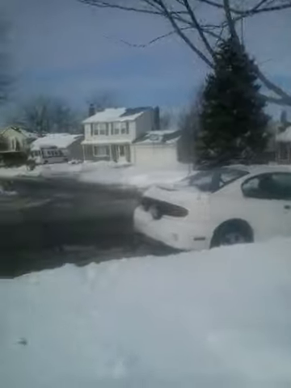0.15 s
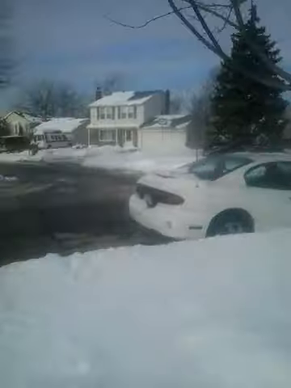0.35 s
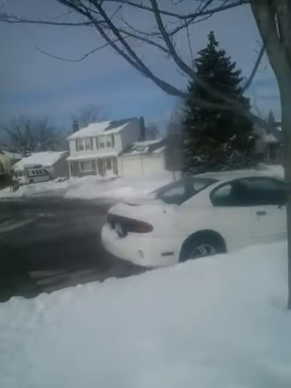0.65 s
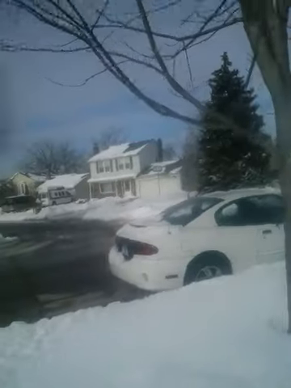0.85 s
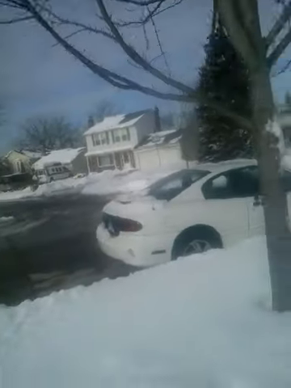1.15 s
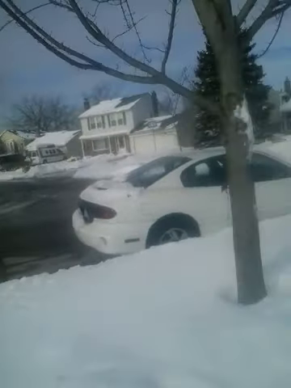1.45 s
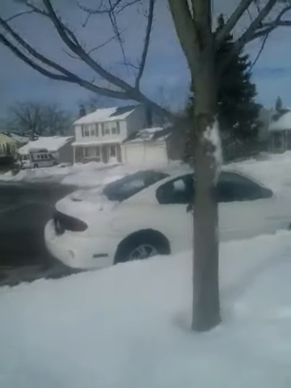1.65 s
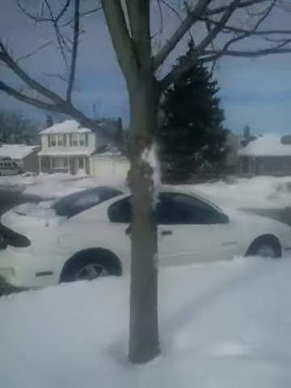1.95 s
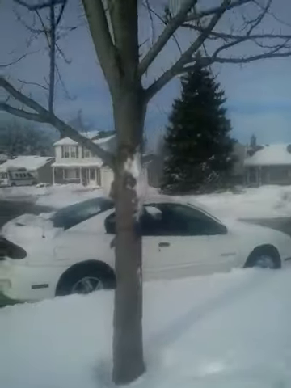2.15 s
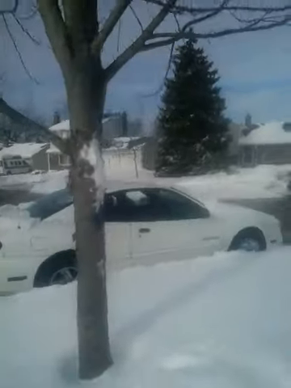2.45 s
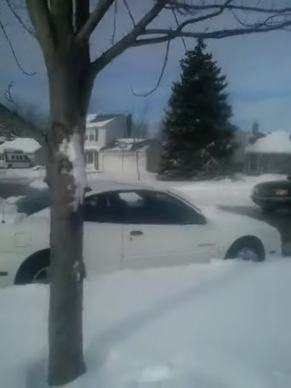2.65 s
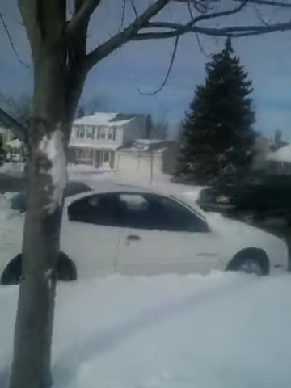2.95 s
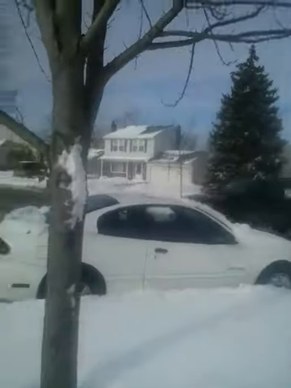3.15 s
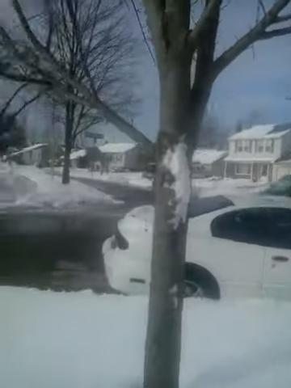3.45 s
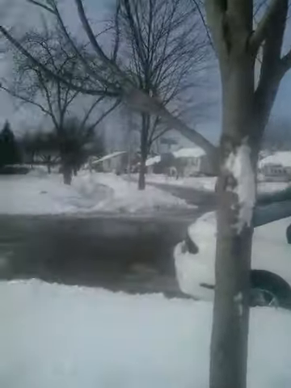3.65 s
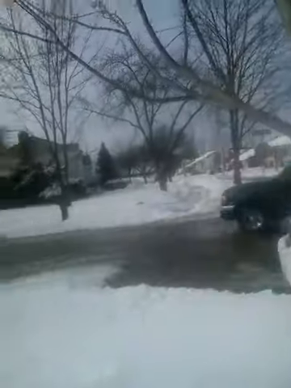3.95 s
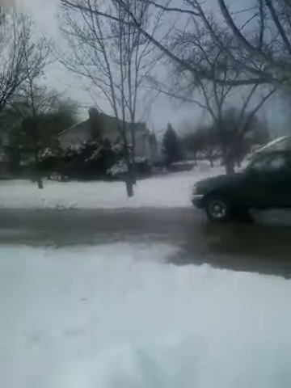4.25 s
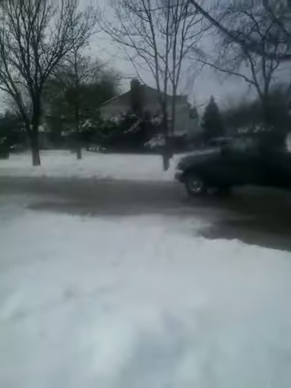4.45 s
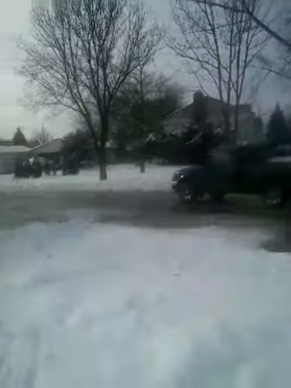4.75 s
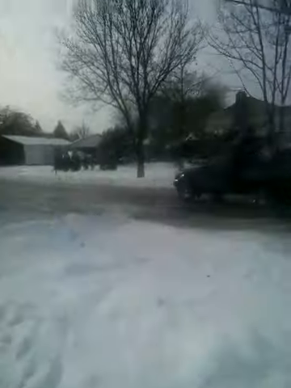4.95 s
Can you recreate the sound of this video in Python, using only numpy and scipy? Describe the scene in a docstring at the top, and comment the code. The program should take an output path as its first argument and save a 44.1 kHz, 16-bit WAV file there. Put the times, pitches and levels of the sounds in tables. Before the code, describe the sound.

Wet, slushy tyre hiss swells as a pickup rolls slowly past, with a close, thin squeak ending in a sharp wet smack early on.

```python
"""A slushy suburban street: a pickup crawls along it, its tyres spitting wet spray (shaped noise and droplets).
A parked car screens the spray for a moment, then it comes into the open; an echo, likely off the road, combs it.
Slush lumps, a thin fling of spray and a brief brake chirp punctuate a dull road roar and a low engine note.
Close by, a thin wet two-note squeak stalls in chirps and ends in a sharp smack, with small wet ticks around it."""
import sys
import numpy as np
from scipy import signal
from scipy.fft import rfft, irfft, next_fast_len
from scipy.io import wavfile
from scipy.ndimage import uniform_filter1d, minimum_filter1d

SR = 44100
rng = np.random.default_rng(int(sys.argv[2]) if len(sys.argv) > 2 else 0)


def unload_audio(sound):
    """Save the sound as a 16-bit wav file, at the path given as the first command line argument."""
    columns = np.transpose(np.atleast_2d(sound))
    # keep every value between -1 and 1, then stretch to whole-number steps
    steps = np.round(np.clip(columns, -1, 1) * 32767)
    wavfile.write(sys.argv[1], SR, steps.astype(np.int16))


N = 225374
TIME = np.arange(N) / SR


def from_db(db):
    """Decibels to gain."""
    return 10 ** (np.asarray(db) / 20)


def rms_one(x):
    """Scale to an rms of 1."""
    return x / np.sqrt(np.mean(x ** 2) + 1e-20)


def white():
    """White noise over the whole scene."""
    return rng.standard_normal(N)


def in_time(rows, column=1):
    """One column of a time table, interpolated at every sample."""
    rows = np.array(rows)
    return np.interp(TIME, np.sort(rows[:, 0]), rows[:, column])


def at_hz(spectrum, hz):
    """Gain of a spectrum, read on a log-frequency axis."""
    spectrum = np.array(spectrum)
    return from_db(np.interp(np.log(hz + 1e-9), np.log(spectrum[:, 0]), spectrum[:, 1]))


def colour(x, spectrum):
    """Filter x by a spectrum; rms 1."""
    size = next_fast_len(N)
    gain = at_hz(spectrum, np.fft.rfftfreq(size, 1 / SR))
    return rms_one(irfft(rfft(x, size) * gain, size)[:N])


def band(x, low_hz, high_hz):
    """Second-order band-pass."""
    return signal.sosfilt(signal.butter(2, [low_hz, high_hz], "band", fs=SR, output="sos"), x)


def cut(x, edge_hz, kind):
    """Gentle low- or high-pass."""
    return signal.sosfilt(signal.butter(2, edge_hz, kind, fs=SR, output="sos"), x)


def read(x, at_s):
    """x at the given moments, between the samples too, wrapping round at the ends."""
    fine = signal.resample_poly(x, 4, 1)
    return np.interp(at_s * SR * 4, np.arange(len(fine)), fine, period=len(fine))


def phase_of(hz):
    """Running phase of a moving pitch."""
    return 2 * np.pi * np.cumsum(hz) / SR


def envelope(start_s, length_s, attack_s, t60_s):
    """Rise, hold until the length is over, die away."""
    age = TIME - start_s
    rise = np.clip(age / attack_s, 0, 1)
    return rise * from_db(-60 * np.maximum(age - length_s, 0) / t60_s)


def drift(rate_hz):
    """Random wander with a spread of 1; a higher rate wanders faster."""
    # made at a tenth of the sample rate; the first 4000 steps let the filter settle
    r = np.exp(-20 * np.pi * rate_hz / SR)
    steps = rng.standard_normal(N // 10 + 4002)
    slow = signal.lfilter([1], [1, -2 * r, r * r], steps)[4000:]
    return np.interp(np.arange(N) / 10, np.arange(len(slow)), rms_one(slow))


def droplets(per_s, spread_db):
    """Random clicks of very uneven size; rms 1."""
    sizes = from_db(spread_db * np.minimum(rng.exponential(1, N), 4)) * rng.choice([-1, 1], N)
    return rms_one(sizes * (rng.random(N) < per_s / SR))


def bursts(rows, width):
    """Each event is a dying puff of noise around its ring pitch."""
    out, age = np.zeros(N), np.arange(SR // 10) / SR
    for start_s, peak_db, ring_hz, t60_s in rows:
        decaying = rng.standard_normal(len(age)) * np.exp(-np.log(1000) * age / t60_s)
        puff = band(decaying, ring_hz / (1 + width), ring_hz * (1 + width))
        puff = from_db(peak_db) * puff / np.abs(puff).max()
        start = round(start_s * SR)
        out[start:start + len(age)] += puff[:N - start]
    return out


# spray colour up the street, beside the parked car and in the open: (frequency [Hz], relative level per Hz [dB])
SPRAY_FAR = [(100, -22), (340, -39), (470, -7), (860, -7), (1120, -14.5), (1850, 4.5), (2070, -6),
             (4220, -4.5), (4520, -6.5), (5040, -7.5), (5560, -19), (7060, 0.5), (10940, -14.5),
             (11500, -17), (14690, -22), (15590, -22)]
SPRAY_BESIDE = [(100, -34), (340, -20), (650, -8.3), (820, 0.5), (1210, -22), (1460, 0), (2020, -5),
                (2280, 0.5), (2970, -7.5), (4440, -5), (5300, -20), (7020, -4), (9560, -6.5),
                (10160, -15.5), (11930, -15.2), (15590, -23.5)]
SPRAY_OPEN = [(100, -11), (340, -14), (1460, -6), (1850, -14.5), (2240, -1), (3190, -7.5), (3360, -11.5),
              (4350, -7), (4820, -25), (5250, -20), (6460, -8.5), (6850, -1.5), (9520, -10.5),
              (11070, -22.5), (12880, -18), (15590, -24.4)]
# the truck's place: (time [s], place [0 up the street, 1 beside the parked car, 2 in the open])
TRUCK_PLACE = [(1.1, 0), (1.8, 1), (3.6, 1), (3.95, 2)]
# short echo, likely off the road: (time [s], lag [ms])
ECHO_LAG = [(0, .88), (.72, .79), (1.0, .87), (1.7, .89), (2.0, .835), (2.8, .755), (3.5, .9), (3.9, .74),
            (4.15, .795), (4.5, .755), (5.11, .735)]
# the spray's brightness near 2.3 kHz: (time [s], gain of that band [dB])
BRIGHTNESS_GAIN = [(1.3, -0.5), (1.9, -3.5), (2.9, 3.5), (4.1, 0), (5.11, 1.5)]


def spray(slide_above_hz=3000, level_db=1.73, scatter_db=-14.5, echo_gain=.38, treble_slide=.8):
    """Tyres throw slush; the hiss takes its colour from the truck's place, and the echo combs it."""
    hiss = wet_hiss(grain=0.95, splash_db=0.5, patchy_db=1.45)
    place, lag_ms = in_time(TRUCK_PLACE), in_time(ECHO_LAG)
    # as the echo paths shorten, the treble is read faster: its peaks and notches slide upward
    slide_s = np.cumsum((.79 / lag_ms) ** treble_slide) / SR
    direct = 0
    for k, (spectrum, trim_db) in enumerate([(SPRAY_FAR, 5.0), (SPRAY_BESIDE, 1.5), (SPRAY_OPEN, 1.5)]):
        view = colour(hiss, spectrum)
        treble = read(cut(view, slide_above_hz, "high"), slide_s + .5)
        view = cut(view, slide_above_hz, "low") + treble
        nearness = np.clip(1 - np.abs(place - k), 0, 1)  # crossfade between places
        direct = direct + view * from_db(trim_db) * nearness
    bright_band = band(direct, low_hz=1880, high_hz=2640)
    direct = direct + (from_db(in_time(BRIGHTNESS_GAIN)) - 1) * bright_band
    # some of the hiss arrives scattered, without peaks or notches
    scattered = rms_one(band(white(), low_hz=1770, high_hz=7000))
    direct = (direct + from_db(scatter_db) * scattered) * spray_gain() * from_db(level_db)
    return direct + echo_gain * read(direct, TIME - lag_ms / 1000)


def wet_hiss(grain, splash_db, patchy_db):
    """Mist and droplets; splashes swell all octaves together, and each also flickers alone."""
    out, splash = 0, drift(35)
    sources = [white() + grain * droplets(per_s=2400, spread_db=5.0) for _ in range(2)]
    for k, low_hz in enumerate(250 * 2. ** np.arange(6)):
        octave = band(sources[k % 2], low_hz, 2 * low_hz)  # neighbours take turns with the sources
        out = out + octave * from_db(splash_db * splash + patchy_db * drift(19))
    return out


# tyre spray as the truck draws near: (time [s], level before trims [dB])
SPRAY_APPROACH = [(0, -49.5), (.88, -47.5), (1.38, -45.5), (1.9, -37.5), (2.6, -38), (4.1, -35.5),
                  (5.11, -34)]
# a tyre ploughs through deeper slush: (time [s], length [s], gain of the swell [dB])
DEEP_SLUSH = [(0.07, 0.023, 4), (0.24, 0.03, 6), (0.326, 0.074, 5), (0.494, 0.12, 4.5), (.612, .16, 8.5),
              (0.945, 0.083, 9), (1.135, 0.025, 3), (2.642, 0.022, 1.5), (4.42, 0.036, 3.5),
              (4.527, 0.054, 3)]


def spray_gain(slosh_attack_s=.017, slosh_t60_s=.22, screen_loss_db=22, screen_power=1.8):
    """The spray grows as the truck nears, swells in deep slush and sinks behind the parked car."""
    swell = sum((from_db(gain_db) - 1) * envelope(start_s, length_s, slosh_attack_s, slosh_t60_s)
                for start_s, length_s, gain_db in DEEP_SLUSH)
    # the parked car hides the tyres slowly and frees them quickly
    hiding, clearing = (TIME - 2.62) / .89, (4.06 - TIME) / .22
    hidden = np.clip(np.minimum(hiding, clearing), 0, 1)
    return (1 + swell) * from_db(in_time(SPRAY_APPROACH) - screen_loss_db * hidden ** screen_power)


# the squeak; its level drives both notes and their air: (time [s], whistle pitch [Hz], level before trims [dB])
SQUEAK_WHISTLE = [(1.13, 7185, -22), (1.16, 7026, -23), (1.172, 8033, -15), (1.178, 9100, -15),
                  (1.194, 9560, -17), (1.222, 7700, -17), (1.246, 8400, -16), (1.256, 8150, -17.5),
                  (1.276, 8800, -17), (1.308, 9340, -18.5), (1.326, 8057, -16.5), (1.354, 7365, -20),
                  (1.414, 7155, -21), (1.42, 6988, -24)]
# its second, reedy note: (time [s], pitch [Hz])
SQUEAK_REED = [(1.13, 3520), (1.166, 3535), (1.186, 5360), (1.194, 5700), (1.22, 4550), (1.23, 4440),
               (1.25, 4570), (1.284, 5470), (1.308, 5420), (1.326, 5000), (1.348, 5200), (1.36, 5637)]


def squeak(whistle_db=-1.0, reed_db=-5.0, air_db=-18.0, coupling=0.037, rough_db=1.0):
    """Air through a narrow wet gap sounds two unrelated notes: a pure whistle and a cavity-shaped reedy one."""
    whistle_hz = in_time(SQUEAK_WHISTLE) * (1 + .015 * drift(220) + .007 * drift(1200))
    reed_hz = in_time(SQUEAK_REED) * (1 + .009 * drift(200))
    # the reedy note speaks first and gives out first
    whistling = envelope(1.164, length_s=.258, attack_s=.02, t60_s=.021)
    buzzing = envelope(1.128, length_s=.18, attack_s=.0087, t60_s=.2)
    # the reedy note throttles the whistle, which adds faint side tones
    throttle = 1 + coupling * buzzing * np.sin(phase_of(reed_hz))
    whistle = np.sin(phase_of(whistle_hz)) * from_db(whistle_db + rough_db * drift(196)) * throttle
    reed = from_db(reed_db) * reedy(reed_hz)
    # turbulence shakes both notes and spreads a halo around them
    turbulence = 1 + .17 * drift(900)
    notes = np.sqrt(2) * turbulence * (whistle * whistling + reed * buzzing)
    air = from_db(air_db) * colour(white(), CAVITY_COLOUR) * np.maximum(whistling, buzzing)
    return (notes + air) * from_db(in_time(SQUEAK_WHISTLE, column=2))


# cavity behind the squeaking gap, which also colours the hiss and the smack: (frequency [Hz], gain [dB])
CAVITY_COLOUR = [(100, -29), (450, -25), (1900, -31), (3000, -12), (4300, -15.5), (5600, -14), (7100, 2),
                 (9000, 3.5), (11000, -6.5), (12200, -13), (14000, -13), (15000, -18), (16000, -28)]


def reedy(hz, top_hz=14500):
    """Four harmonics shaped by the cavity, fading steeply above the top."""
    out = 0
    for k in range(1, 5):
        gain = at_hz(CAVITY_COLOUR, k * hz) / (1 + (k * hz / top_hz) ** 20)
        out = out + np.sin(k * phase_of(hz)) * gain
    return out


# the squeak stalls: (time [s], length [s], starting whistle [Hz], starting lower note [Hz], whistle level [dB])
STALL_CHIRPS = [(1.424, .014, 7130, 4580, -30.5), (1.456, 0.005, 7200, 4880, -24)]


def chirps(fall_oct_per_s=19, lower_fall_share=.5, lower_db=-8.5, attack_s=.003, t60_s=.065):
    """Both notes catch again and slide down unsteadily, the lower one more slowly."""
    out = 0
    for start_s, length_s, whistle_hz, lower_hz, level_db in STALL_CHIRPS:
        fall = 2 ** -np.clip(fall_oct_per_s * (TIME - start_s), 0, 1)  # one octave at most
        waver = 1 + .018 * drift(220)
        whistle = np.sin(phase_of(whistle_hz * waver * fall))
        lower = np.sin(phase_of(lower_hz * waver * fall ** lower_fall_share))
        notes = np.sqrt(2) * (whistle + from_db(lower_db) * lower)
        out = out + notes * from_db(level_db) * envelope(start_s, length_s, attack_s, t60_s)
    return out


# hiss around the squeak: a slow swell, short puffs, and a brief rise into the smack:
# (time [s], length [s], attack [s], level [dB])
SQUEAK_HISS = [(0.958, 0.18, .18, -28.5), (1.163, .012, .008, -33), (1.421, 0.017, 0.0051, -22.5),
               (1.442, 0.037, .01, -31), (1.493, 0.013, .012, -25)]
# the hollow body of the smack: (frequency [Hz], relative level per Hz [dB])
SMACK_BODY_COLOUR = [(24, -53), (40, -23), (350, -19), (569, 0.5), (878, -13), (1130, -6), (1280, -17),
                     (1590, -21), (1810, -0.5), (3000, -23), (3900, -45), (6600, -120)]


def smack(burst_db=-4.5, tail_db=-27.0, pop_db=-17.5, body_db=-6.5, hiss_t60_s=.08):
    """Hiss leads in, air bursts as the seal breaks, and the opening gives a broad crack with a low body."""
    hiss = colour(white() + .7 * droplets(per_s=1500, spread_db=3.5), CAVITY_COLOUR)
    hiss_gain = sum(from_db(level_db) * envelope(start_s, length_s, attack_s, hiss_t60_s)
                    for start_s, length_s, attack_s, level_db in SQUEAK_HISS)
    # the burst swells as the seal gives
    burst = rms_one(band(colour(white(), CAVITY_COLOUR), 5800, 12500)) * from_db(2.5 * drift(400))
    breaking = envelope(1.497, length_s=.028, attack_s=.014, t60_s=.0084)
    tail = from_db(tail_db) * envelope(1.497, length_s=.028, attack_s=.014, t60_s=.11)
    # the gap snaps open at its end
    crack = rms_one(band(white(), 2300, 16300))
    body = from_db(body_db) * colour(white(), SMACK_BODY_COLOUR)
    pop = (crack + body) * envelope(1.511, length_s=.0115, attack_s=.0056, t60_s=.044)
    return hiss * hiss_gain + from_db(burst_db) * burst * (breaking + tail) + from_db(pop_db) * pop


# small wet ticks: (time [s], peak before the high-pass [dB], ring [Hz], t60 [s])
WET_TICKS = [(.9585, -21, 12100, 0.0035), (1.027, -18.5, 9250, .02), (1.058, -15, 9150, 0.018),
             (1.181, -10, 9550, .012), (1.4375, -9, 8070, 0.003), (1.4893, -15, 8320, 0.0028),
             (1.4925, -12, 8240, .003), (1.4987, -11, 8450, .003), (1.627, -26, 12900, 0.0065),
             (1.732, -25, 12000, 0.0053), (1.794, -14, 10000, 0.049), (1.82, -20, 13000, .015),
             (2.038, -21, 8900, 0.013), (2.367, -21, 13000, 0.0054)]


def ticks():
    """Tiny wet clicks: short puffs of noise at a high ring pitch, thinned by a high-pass."""
    return cut(bursts(WET_TICKS, width=0.32), edge_hz=3800, kind="high")


# lumps of slush bursting under the tread: (time [s], peak [dB], ring [Hz], t60 [s])
SLUSH_LUMPS = [(.033, -24.5, 7260, .012), (.272, -31, 3800, 0.022), (2.531, -31.5, 840, 0.017),
               (2.677, -27, 7600, .008), (3.075, -30.5, 454, 0.039), (3.83, -36, 1394, .012),
               (4.086, -24.5, 2600, .015), (4.137, -21, 2630, .015), (4.325, -23.5, 990, 0.034),
               (4.636, -22, 2950, 0.024), (4.674, -28, 991, 0.022), (4.78, -28, 960, .02),
               (5.065, -21.5, 2440, 0.012)]


def splats():
    """Slush lumps burst under the tread, each a dying puff of noise around its ring pitch."""
    return bursts(SLUSH_LUMPS, width=0.16)


def fling(level_db=-51.5):
    """Fine spray flung from behind the parked car, heard only as a high hiss."""
    mist = rms_one(band(white(), 8300, 11600))
    return mist * from_db(level_db) * envelope(3.28, length_s=.11, attack_s=.05, t60_s=.25)


# brief brake chirp: (time [s], pitch [Hz], level [dB])
BRAKE_MODES = [(4.455, 11550, -35), (4.455, 12460, -36)]


def brake(width_s=0.0088):
    """Two high modes sing for an instant, each a sine with a wandering phase in a bell-shaped swell."""
    out = 0
    for centre_s, hz, level_db in BRAKE_MODES:
        swell = from_db(level_db) * np.exp(-((TIME - centre_s) / width_s) ** 2)
        out = out + swell * np.sin(2 * np.pi * hz * TIME + drift(60))
    return np.sqrt(2) * out


# road roar: (time [s], level before trim [dB])
ROAR_COURSE = [(0.0, -54), (0.44, -52.5), (1.31, -54), (1.99, -48), (3.12, -45.5), (3.59, -47.5),
               (3.98, -43), (4.28, -44.5), (4.6, -47.5), (5.11, -51)]
# its colour: (frequency [Hz], relative level per Hz [dB])
ROAR_COLOUR = [(30, -29), (85, -29), (150, -18), (260, -3), (690, -1.5), (950, -9), (1550, -8.0),
               (1940, -14.7), (2450, -6), (2800, -15.5), (6240, -23.5), (7320, -11), (9300, -17.5),
               (10030, -22.5), (15590, -31)]


def road_roar(trim_db=3.5, flutter_db=0.86):
    """Dull rolling noise, which bends around the parked car."""
    level_db = in_time(ROAR_COURSE) + trim_db + flutter_db * drift(25)
    return colour(white(), ROAR_COLOUR) * from_db(level_db)


# engine load: (time [s], level before trim [dB])
ENGINE_COURSE = [(0, -75.5), (1.7, -69), (3.2, -67), (3.95, -59.5), (4.45, -70), (5.11, -63)]


def engine(start_hz=106.3, sag_hz_per_s=.88, wander_hz=0.76, trim_db=-3.0, waver_db=3.0):
    """The firing note of the engine at low revs, a wandering sine that sinks as the truck slows."""
    phase = phase_of(start_hz - sag_hz_per_s * TIME + wander_hz * drift(5.3))
    level_db = in_time(ENGINE_COURSE) + trim_db + waver_db * drift(5.4)
    return np.sqrt(2) * np.sin(phase) * from_db(level_db)


def scene():
    """The street, and the squeak close by."""
    street = spray() + fling() + road_roar() + engine() + brake() + splats()
    close_by = squeak() + chirps() + smack() + ticks()
    return (street + close_by)[None, :]


def record(dry):
    """A fast limiter holds the loudest peaks, then a steep low-pass cuts the top."""
    allowed = np.minimum(1, .75 / (np.abs(dry) + 1e-9))
    gain = uniform_filter1d(minimum_filter1d(allowed, size=45), size=45)  # about 1 ms each
    return signal.sosfilt(signal.ellip(12, .1, 80, 15900, fs=SR, output="sos"), dry * gain)


dry = scene()
out = record(dry)
unload_audio(out)
```